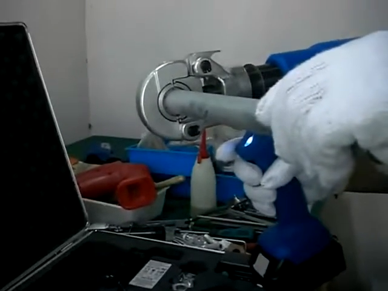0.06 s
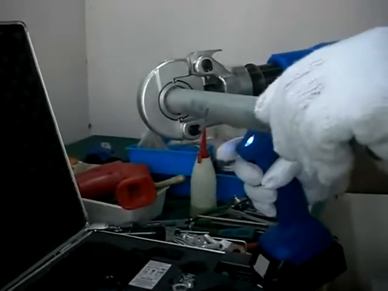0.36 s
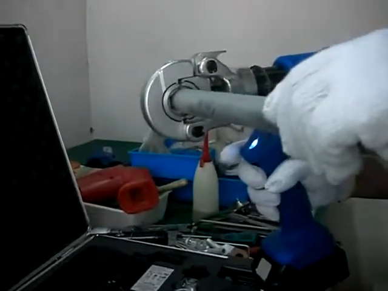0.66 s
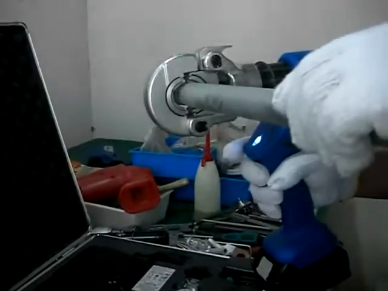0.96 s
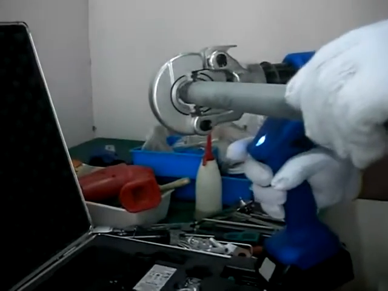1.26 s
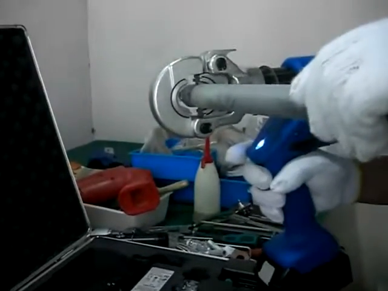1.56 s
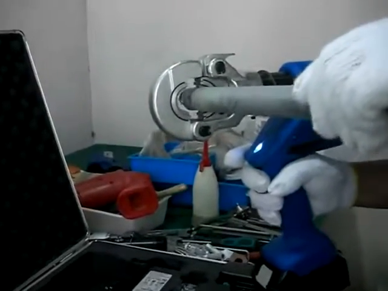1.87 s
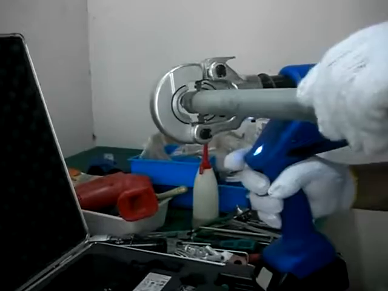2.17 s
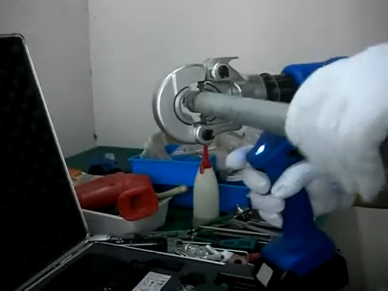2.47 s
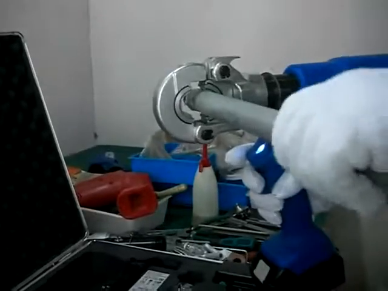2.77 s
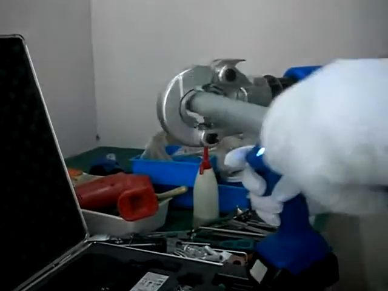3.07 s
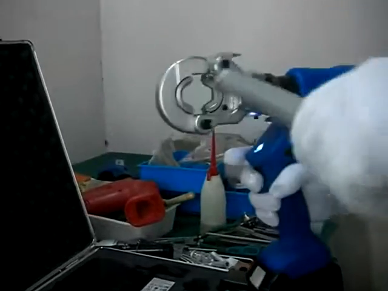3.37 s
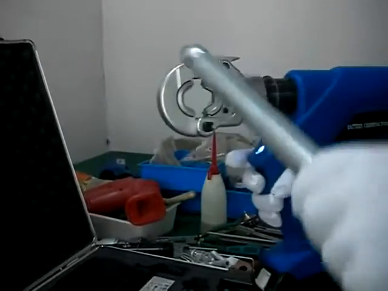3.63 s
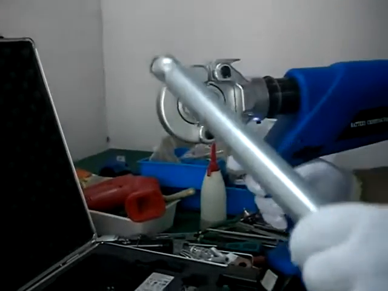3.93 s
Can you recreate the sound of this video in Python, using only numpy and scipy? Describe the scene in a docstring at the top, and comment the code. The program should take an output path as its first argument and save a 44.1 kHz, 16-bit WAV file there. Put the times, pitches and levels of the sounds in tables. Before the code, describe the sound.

A cordless crimping tool pulses and stops, then a metal pipe knocks against its jaws.

```python
"""A small workshop, close to a cordless hydraulic crimper finishing a crimp. Each pump stroke rattles
the gears and drags the motor down; it whines up to free speed, brakes with a groan, and the tool
clicks off. A gloved hand shifts its grip, then the steel pipe knocks and rings against the jaws,
scraping once, as it is pulled out. Close walls echo, and steady room noise lies under it all."""
import sys
import numpy as np
from scipy import signal
from scipy.fft import rfft, irfft
from scipy.io import wavfile
from scipy.ndimage import uniform_filter1d, map_coordinates

SR = 44100
rng = np.random.default_rng(int(sys.argv[2]) if len(sys.argv) > 2 else 0)


def persist_wave(psi):
    """Save psi, clipped to +-1, as 16-bit WAV."""
    counts = np.round(np.clip(psi, -1, 1) * 32767).astype(np.int16)
    wavfile.write(sys.argv[1], SR, np.atleast_2d(counts).T)


N = 176400
T = np.arange(N) / SR

# pump strokes: start t/s, length/s, load (1 = full)
PUMP_STROKES = [(-.012, 0.041, 0.89), (0.063, 0.039, 0.98), (0.141, 0.04, 1.0), (0.216, .046, 1.05),
                (0.303, .040, .95), (0.373, 0.029, 0.98), (0.456, 0.015, 0.36)]
def crimper():
    """Each pump stroke loads the drive and slows the shaft; it recovers, runs free, then brakes."""
    attack_s, release_s, inertia_s = .0065, .008, .036
    free_hz, sag_hz, brake_at_s, brake_length_s = 368, 79, .6217, .04
    load = 0
    for start, length, size in PUMP_STROKES:
        attack = np.clip((T - start) / attack_s, 0, 1)
        load += size * attack * np.exp(-np.maximum(T - start - length, 0) / release_s)
    pole = np.exp(-1 / (inertia_s * SR))
    drag = signal.lfilter([1 - pole], [1, -pole], load, zi=[.5])[0]  # speed lags behind the load
    shaft_hz = (free_hz - sag_hz * drag) * (1 + .003 * walk(90))
    running = np.clip(1 - (T - brake_at_s) / brake_length_s, 0, 1)
    whirr_gain = (shaft_hz / free_hz) ** 2.02 * running ** 1.64
    return gears(shaft_hz, load, whirr_gain) + motor(shaft_hz * running ** .5, drag, load) + braking()


# hard gear clacks within the strokes: t/s, relative level/dB
GEAR_CLACKS = [(.006, 3.5), (0.067, -0.5), (0.084, -2.5), (0.099, -3), (0.156, -5), (0.178, -1.5),
               (0.223, -0.5), (0.239, 3.5), (0.254, 2.5), (0.305, 4), (.318, 3.5), (0.334, -1),
               (.397, -0.5)]
# gear EQ under load and running free: f/Hz, level/dB
STRAIN_EQ = [(250, -24.5), (600, -12), (1000, -13), (1400, -12.5), (1720, -3), (2300, 2), (2800, -10),
             (3450, -3), (4200, -7.5), (5000, -16.5), (7000, -18), (10000, -20), (14500, -26.5)]
WHIRR_EQ = [(150, -29), (270, -14.5), (420, -11), (680, -1.5), (950, -12), (1400, -8.5), (1750, 1),
            (2300, 2), (2800, -12), (3600, -6.5), (4800, -15), (7000, -14), (10000, -17), (14500, -25)]
# housing resonances: f/Hz, t60/s, relative level/dB
HOUSING_MODES = [(1784, 0.041, -1), (1895, 0.021, -3), (2225, 0.021, 1.5), (2484, 0.058, -6.5),
                 (2453, .02, -1.5), (3300, 0.035, -12.5), (3450, .03, -6.5), (3650, 0.025, 0.5),
                 (4115, 0.046, -2)]
def gears(shaft_hz, load, whirr_gain):
    """Gears whirr as they spin, rasp and clack under load, and set the housing ringing."""
    turns = np.cumsum(shaft_hz) / SR
    whirr = chatter(turns, scatter_db=.3, grit=15, decay_turns=1) * whirr_gain
    rasp = chatter(turns, scatter_db=2.5, grit=1.75, decay_turns=.5) * load
    clacks = sum(amp(db + 3.5) * (T >= s) * np.exp(-np.abs(T - s) / .0013) for s, db in GEAR_CLACKS)
    strain = rasp + clacks * stereo_noise(width=.16)
    housing = convolve(strain + .35 * whirr, unit_energy(ring(HOUSING_MODES)))
    return amp(-19) * shape(strain, STRAIN_EQ) + amp(-23) * shape(whirr, WHIRR_EQ) + amp(-26.5) * housing


def chatter(turns, scatter_db, grit, decay_turns):
    """One uneven gear impact per shaft turn, each with a spray of finer contacts."""
    turn = turns.astype(int)
    force = amp(scatter_db * np.clip(rng.standard_normal(N), -2, 2))[turn]
    clicks = np.diff(turn, prepend=0) * force
    spray = stereo_noise(width=.56) * force * np.exp(-(turns % 1) / decay_turns)
    return unit_rms(unit_rms(clicks) + grit * unit_rms(spray))


# hum partials: multiple of the shaft speed, level/dB before ducking
SHAFT_PARTIALS = [(1, -32.5), (2, -43.5), (3, -45), (6, -58)]
def motor(shaft_hz, drag, load):
    """The shaft's fluttering hum and whine duck under load, then sink and fade once power is cut."""
    power_off_s, spin_down_s, fade_s, whine_order = .6, .15, .01, 15
    coast_s = np.maximum(T - power_off_s, 0)
    phase = 2 * np.pi * np.cumsum(shaft_hz * np.exp(-coast_s / spin_down_s)) / SR
    hum = 0
    for order, db in SHAFT_PARTIALS:
        flutter_db = 2.5 * np.sqrt(order) * (.8 + drag) * walk(44.5)
        hum += amp(db + flutter_db) * np.sin(order * phase)
    hum *= amp(-11 * drag - 4.5 * load)
    whine_db = -36.5 - 17 * drag + 2.5 * walk(270)
    whine = amp(whine_db) * np.sin(whine_order * phase + .45 * walk(400))
    return np.sqrt(2) * (hum + whine) * np.exp(-coast_s / fade_s)


# shudder EQ: f/Hz, level/dB
SHUDDER_EQ = [(200, -29.5), (430, -3.5), (690, 0), (950, -21), (2000, -9.5), (6000, -56)]
def braking():
    """The drive shudders and gives a short falling groan as it stops."""
    peak_s, centre_hz, fall_hz_per_s = .639, 685, 1200
    glide = sine(centre_hz - fall_hz_per_s * (T - peak_s))
    groan = glide * amp(-26.5 + 2 * walk(150)) * swell(peak_s, width_s=.014)
    shudder = shape(stereo_noise(width=.22), SHUDDER_EQ) * swell(at_s=.638, width_s=.011)
    return groan + amp(-31.5) * shudder


# click EQ: f/Hz, level/dB
CLICK_EQ = [(150, 1), (520, 8.5), (1000, 1.5), (1400, 0.5), (1850, 9), (2500, 2), (3100, 1), (4000, 12),
            (4600, 8), (5150, 6), (5700, 6), (7500, 5.5), (10500, 9.5), (14000, 7.5)]
# latch resonances: f/Hz, t60/s, relative level/dB
LATCH_MODES = [(4382, .13, -6), (4700, .15, -7), (5179, 0.026, 23), (4900, .13, -8), (8770, .1, -4),
               (10090, .2, -3), (11480, .1, 0), (13500, 0.12, -7)]
def latch():
    """The latch lets go with a sharp click and a thin ring."""
    ringing = amp(-23.5) * ring(LATCH_MODES)
    return strike(start_s=.7318, contact_s=.0014, fall_s=.0016, eq=CLICK_EQ, ringing=ringing)


# EQ bands of a knock: f/Hz
KNOCK_BANDS = [250, 700, 1600, 3700, 7000, 12000]
# pipe hits: t/s, contact/s, level/dB in each of the six bands, relative ring/dB, ring tilt/(dB/octave)
PIPE_KNOCKS = [(2.65, 0.0029, -43, -34, -31, -24, -22.5, -38, -51, 2),
               (2.710, 0.0011, -45, -40, -25, -21, -40, -48, -55, -5),
               (2.759, 0.00093, -45, -38, -34.5, -33, -39, -30, -58, 0),
               (3.043, 0.0038, 3, 2.5, -8, -25.5, -50, -62, -53, -15.5),
               (3.179, 0.0019, -18, -6, -5, -7.5, -16.5, -15.5, -42, -5),
               (3.220, 0.0009, -18, 3, -1, 12.5, -7, -12.5, -14.5, -4.5),
               (3.231, 0.003, -9.5, 7, -4, -29, -18, -16, -28.5, -6.5),
               (3.328, 0.0039, -7.5, 6, 12.5, 15.5, 5.5, 9, -1, 2.5),
               (3.412, 0.0014, -9, 1.5, 14, 0, -13, -9.5, -9, 2.5)]
# pipe and jaw resonances: f/Hz, t60/s, relative level/dB
PIPE_MODES = [(1398, 0.035, 1), (1767, .05, -0.5), (2900, 0.017, 4.5), (3603, 0.019, 7.5), (3620, .17, -3),
              (3730, .13, -10), (3750, .12, -14.5), (4115, 0.033, 9), (4650, 0.11, -13.5), (5000, .025, 4),
              (6720, 0.12, -17.5), (6605, 0.037, 11.5), (6500, .15, -21), (6700, .15, -15),
              (10300, .15, -6.5), (10200, 0.069, 1), (10970, .14, -9), (13650, .13, -11),
              (14050, 0.078, -20)]
def pipe():
    """The pipe ticks and knocks its way out of the jaws, then gives one tiny squeak."""
    knocks, fall_s = 0, .0042
    for start_s, contact_s, *band_db, ring_db, tilt_db in PIPE_KNOCKS:
        ringing = amp(ring_db) * ring(PIPE_MODES, tilt_db)
        knocks += strike(start_s, contact_s, fall_s, list(zip(KNOCK_BANDS, band_db)), ringing)
    squeak = sine(1980 * (1 + .09 * walk(1400))) * swell(at_s=3.773, width_s=.0027)
    return knocks + amp(-45.5) * squeak


def strike(start_s, contact_s, fall_s, eq, ringing, size=3000):
    """Metal chatters on metal for a few milliseconds, then rings on."""
    envelope = np.exp(-np.maximum(T[:size] - contact_s, 0) / fall_s)
    crack = colour(unit_energy(stereo_noise(width=.75)[:, :size] * envelope), eq)
    out, at = np.zeros((2, 2 * N)), int(start_s * SR)
    for part in (crack, ringing * amp(-24)):
        out[:, at:at + part.shape[1]] += part
    return out[:, :N]


# a gritty scrape, then a brief swell of noise: centre t/s, width/s, level/dB
GRIT_SWELLS = [(3.204, 0.012, -45), (3.317, 0.0065, -42.5)]
# grit EQ: f/Hz, level/dB
GRIT_EQ = [(400, -9.5), (1300, 13), (2500, 1.5), (3800, 5), (5500, -7), (8000, -13), (14000, -15)]
# resonances of the loosening pipe: f/Hz, t60/s, relative level/dB
LOOSE_MODES = [(2850, .4, -1), (3700, .3, -2), (4430, 0.49, -6.5), (5350, 0.37, -9)]
def loosening():
    """The pipe rings faintly and scrapes once; noise swells briefly just before the loudest knock."""
    grit = shape(stereo_noise(width=.5) * amp(3.4 * walk(560)), GRIT_EQ)
    envelope = sum(amp(db) * swell(s, width) for s, width, db in GRIT_SWELLS)
    modes = unit_energy(ring(LOOSE_MODES))
    friction = stereo_noise(width=.37) * swell(at_s=3.05, width_s=.052)
    return grit * envelope + amp(-59.5) * convolve(friction, modes)


# grip shifts: centre t/s, width/s, level/dB
GLOVE_RUBS = [(2.62, 0.23, -61.5), (2.78, 0.021, -60), (2.92, 0.035, -69)]
# cloth EQ: f/Hz, level/dB
CLOTH_EQ = [(800, -21), (2500, -13), (5000, -12), (8000, -13.5), (14000, -10.5)]
def glove():
    """Cloth rubs faintly along the pipe."""
    cloth = shape(stereo_noise(width=.2) * amp(2.46 * walk(130)), CLOTH_EQ)
    return cloth * sum(amp(db) * swell(s, width) for s, width, db in GLOVE_RUBS)


# reverb EQ: f/Hz, level/dB
REVERB_EQ = [(100, -9), (400, -12.5), (1500, -11.5), (4000, -12), (8000, -9.5), (14000, -12)]
def reverb(x):
    """Dense echoes from close walls; the treble dies first."""
    split_hz, build_s = 5500, .0027
    low = butter(stereo_noise(width=.82), 2, split_hz, "low") * decay(t60_s=.53)
    high = butter(stereo_noise(width=.35), 2, split_hz, "high") * decay(t60_s=.28)
    tail = (low + high) * (1 - np.exp(-T / build_s))
    return convolve(x, colour(unit_energy(tail), REVERB_EQ))


# room tone EQ: f/Hz, level/dB
ROOM_TONE_EQ = [(12, -10), (25, 1.5), (45, -5), (70, -10.5), (100, -9), (160, -5.5), (240, -10.5),
                (400, -8.5), (510, -14.5), (650, -10), (1000, -11.5), (1350, -14), (1650, -21.5),
                (2500, -25), (4500, -30.5), (7000, -34), (11000, -49), (14000, -57.5)]
def room_tone():
    """A steady bed of workshop noise with a faint, wavering mains hum."""
    hum = sine(99.5 + 1.7 * walk(2.9)) * amp(-60.5 + 4 * walk(3.9))
    bed_db = -49 + .5 * walk(5.64)
    bed = colour(stereo_noise(width=.29, mono_below_hz=15), ROOM_TONE_EQ)
    return amp(bed_db) * unit_rms(bed) + hum


def amp(db):
    """Decibels to gain."""
    return 10 ** (np.asarray(db) / 20)


def unit_rms(x):
    """Scale to rms 1."""
    return x / np.sqrt(np.mean(x ** 2) + 1e-18)


def unit_energy(x):
    """Scale a stereo sound to a mean energy of 1 per channel."""
    return x / np.sqrt(np.sum(x ** 2) / 2)


def sine(hz):
    """A tone that follows a pitch curve."""
    return np.sin(2 * np.pi * np.cumsum(hz) / SR)


def swell(at_s, width_s):
    """A bell-shaped rise and fall."""
    return np.exp(-.5 * ((T - at_s) / width_s) ** 2)


def decay(t60_s):
    """An envelope that falls 60 dB in t60_s."""
    return np.exp(-np.log(1000) * T / t60_s)


def walk(rate_hz):
    """Smooth random wander with a spread near 1."""
    step = max(int(SR / rate_hz), 1)
    return uniform_filter1d(rng.standard_normal(N)[np.arange(N) // step], step)


def stereo_noise(width, mono_below_hz=3400):
    """Noise that is centred in the bass and wider above."""
    mid, side = rng.standard_normal((2, N))
    side = width * butter(side, 1, mono_below_hz, "high")
    return unit_rms(np.array([mid + side, mid - side]))


def ring(modes, tilt_db=0, size=30000):
    """Decaying modes that waver a little, each with its own strength left and right."""
    out = 0
    for hz, t60_s, db in modes:
        wobble_hz = .009 * hz * np.repeat(rng.standard_normal(size // 200 + 1), 200)[:size]
        polarity = rng.choice([-1, 1])
        gain = amp(db + tilt_db * np.log2(hz / 5000) + rng.standard_normal((2, 1)))
        out += polarity * gain * sine(hz + wobble_hz) * decay(t60_s)[:size]
    return out


def butter(x, order, hz, kind):
    """A filter with a flat passband."""
    return signal.sosfilt(signal.butter(order, hz, kind, fs=SR, output="sos"), x)


def convolve(x, response):
    """Pass a sound through an impulse response."""
    return signal.fftconvolve(np.atleast_2d(x), np.atleast_2d(response), axes=-1)[:, :N]


def colour(x, eq, size=4096):
    """Minimum-phase EQ through (f/Hz, level/dB) points."""
    hz, db = np.array(eq, float).T
    bin_hz = np.arange(size // 2 + 1) * SR / size
    gain = amp(np.interp(np.log(bin_hz + 1), np.log(hz), db))
    cepstrum = irfft(np.log(gain))
    cepstrum[1:size // 2] *= 2
    cepstrum[size // 2 + 1:] = 0
    return convolve(x, irfft(np.exp(rfft(cepstrum))))


def shape(x, eq):
    """EQ with make-up gain, so that white noise keeps its power."""
    return colour(x, eq) / np.sqrt(np.sum(colour(np.ones(1), eq) ** 2))


def pan(x, right_db, lag_s):
    """Sound from the right reaches the left channel later and weaker."""
    left = map_coordinates(x[0], [np.arange(N) - lag_s * SR])
    return np.array([left, x[1]]) * amp([[-right_db / 2], [right_db / 2]])


def scene():
    """Tool and pipe sit close by on the right, over the room tone."""
    click = latch()
    action = pan(crimper(), right_db=2.2, lag_s=0) + pipe() + loosening() + glove()
    foreground = click + action + reverb(action + amp(1) * click)
    return pan(foreground, right_db=2.5, lag_s=42e-6) + pan(room_tone(), right_db=3, lag_s=80e-6)


def record(dry):
    """Master EQ: a narrow treble notch and a steep cut at the top."""
    notch_hz, top_hz = (7550, 8050), 14400
    notched = butter(dry, 2, notch_hz, "bandstop")
    return signal.sosfilt(signal.ellip(8, .2, 70, top_hz, fs=SR, output="sos"), notched)


dry = scene()
out = record(dry)
persist_wave(out)
```